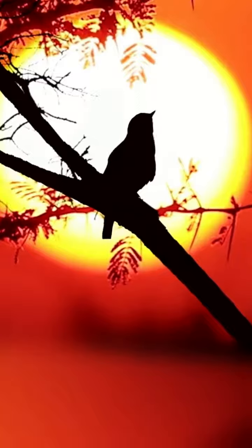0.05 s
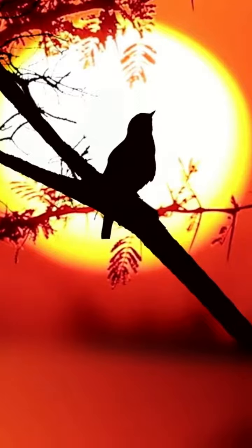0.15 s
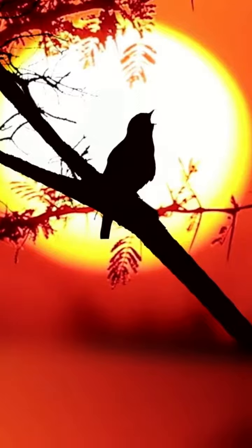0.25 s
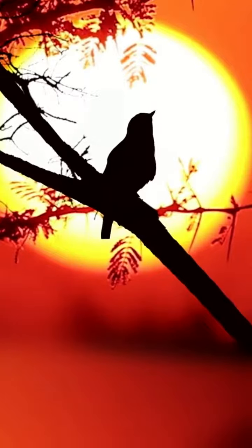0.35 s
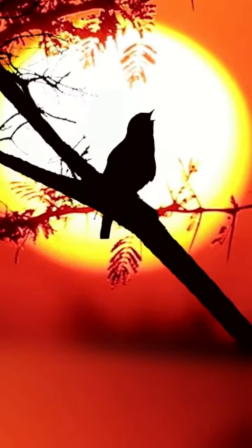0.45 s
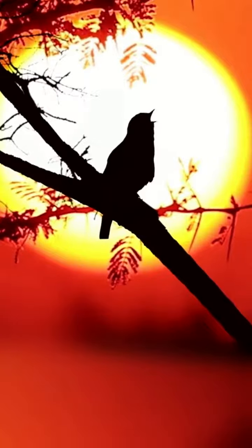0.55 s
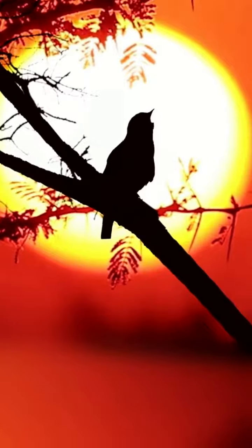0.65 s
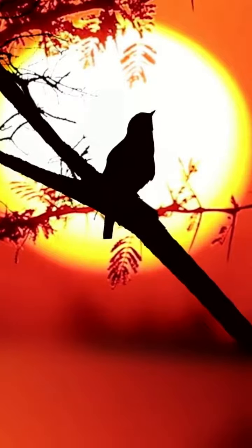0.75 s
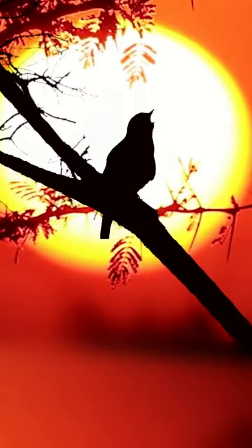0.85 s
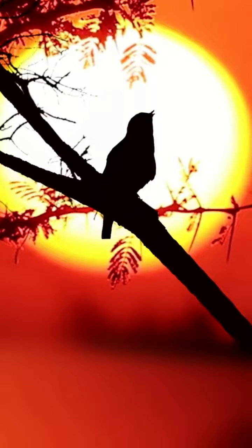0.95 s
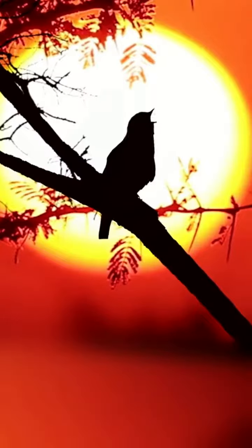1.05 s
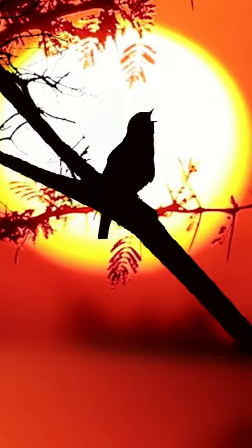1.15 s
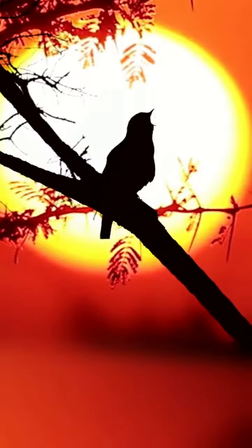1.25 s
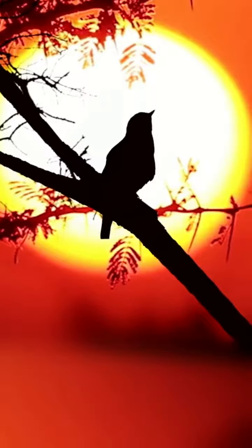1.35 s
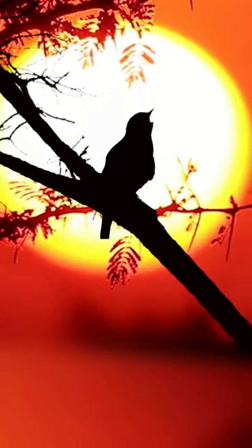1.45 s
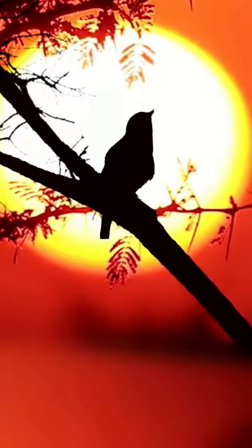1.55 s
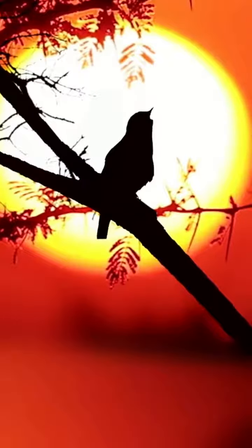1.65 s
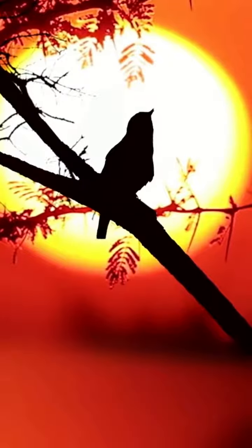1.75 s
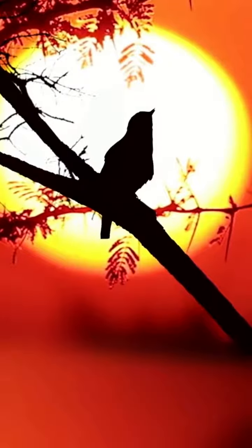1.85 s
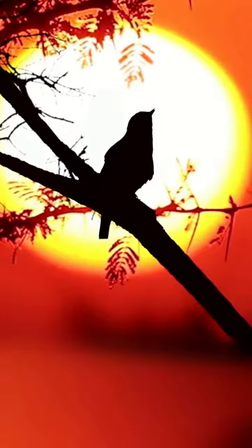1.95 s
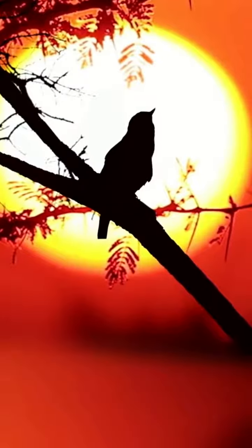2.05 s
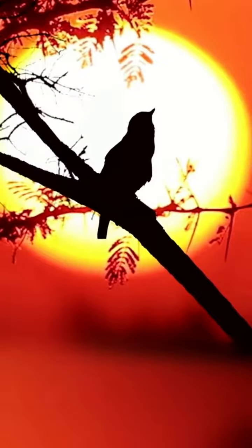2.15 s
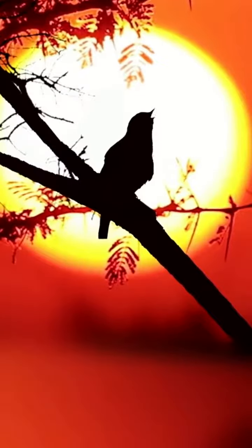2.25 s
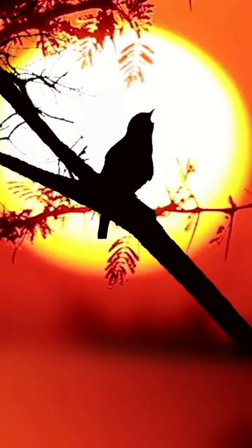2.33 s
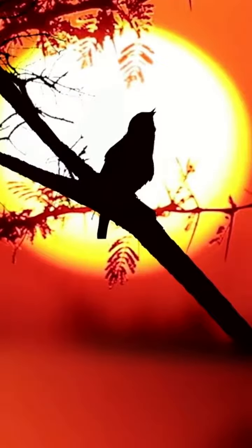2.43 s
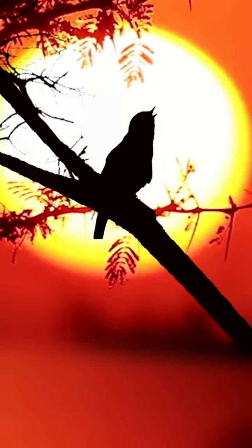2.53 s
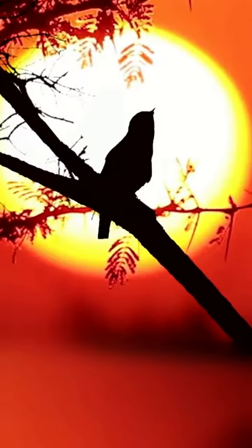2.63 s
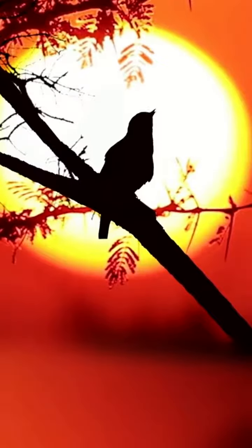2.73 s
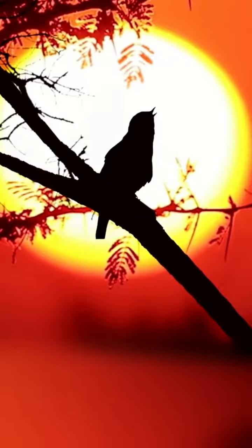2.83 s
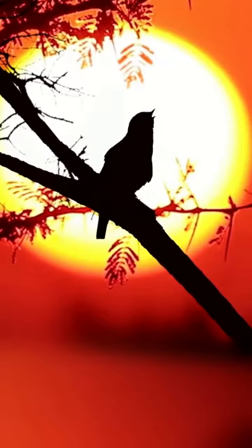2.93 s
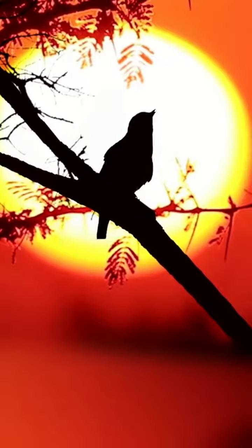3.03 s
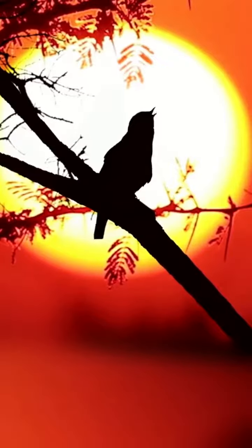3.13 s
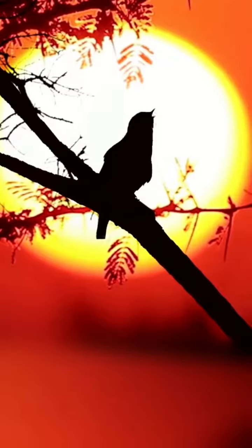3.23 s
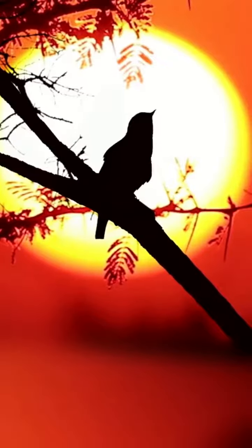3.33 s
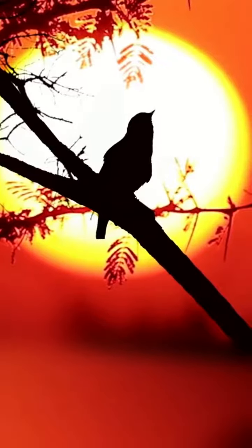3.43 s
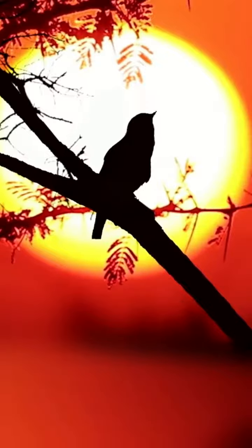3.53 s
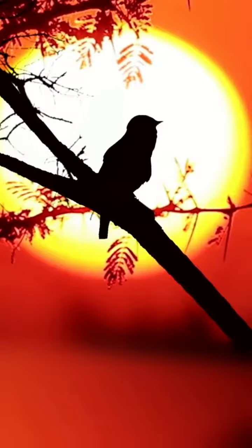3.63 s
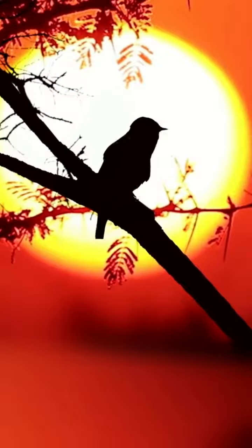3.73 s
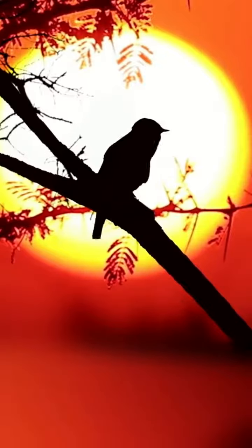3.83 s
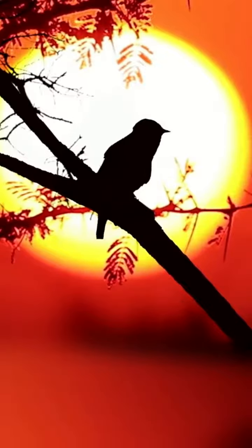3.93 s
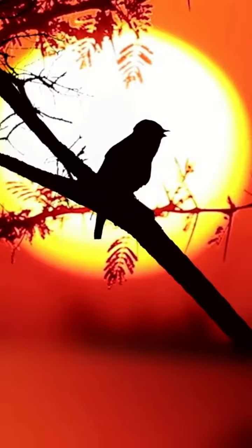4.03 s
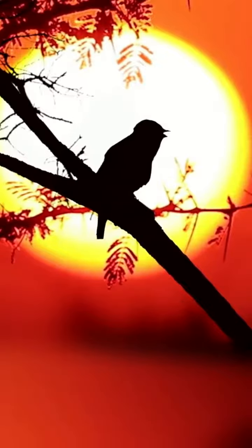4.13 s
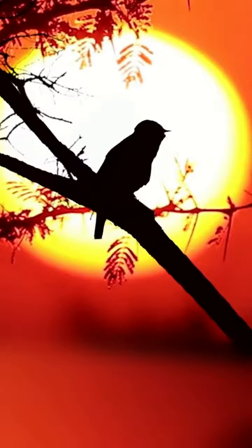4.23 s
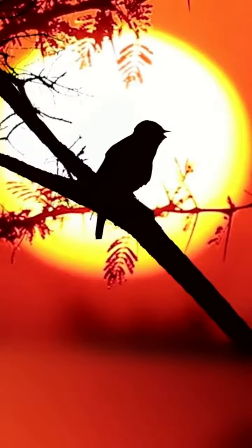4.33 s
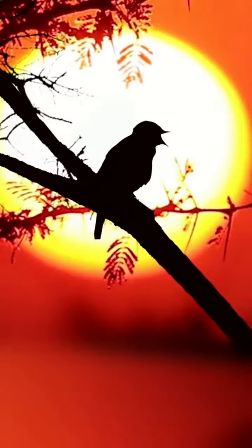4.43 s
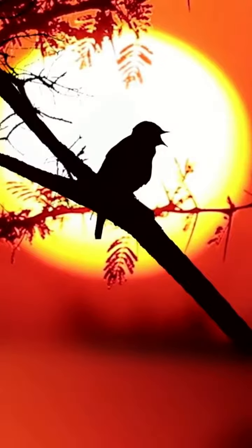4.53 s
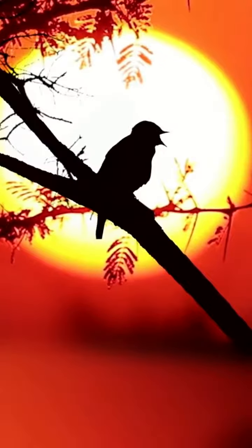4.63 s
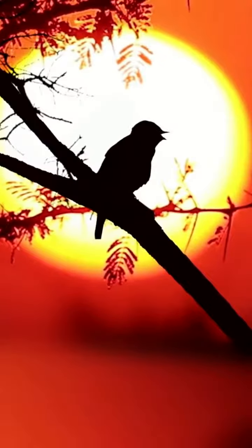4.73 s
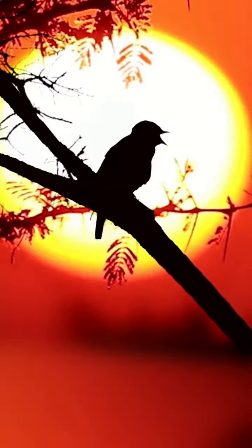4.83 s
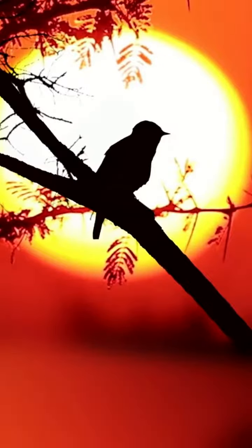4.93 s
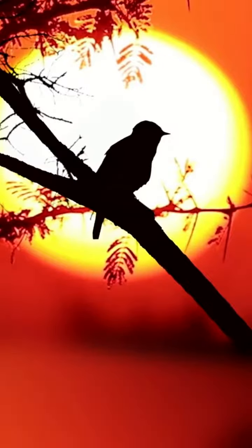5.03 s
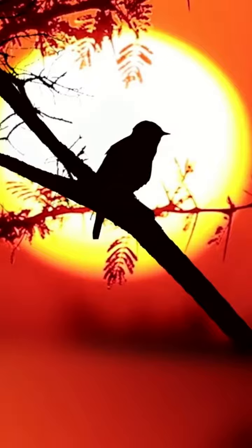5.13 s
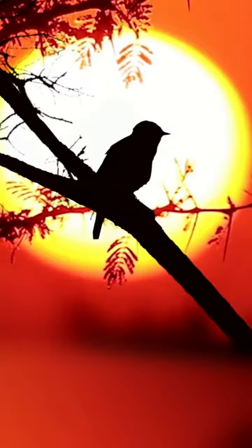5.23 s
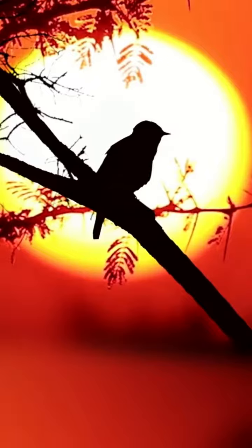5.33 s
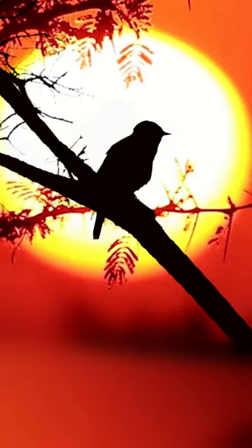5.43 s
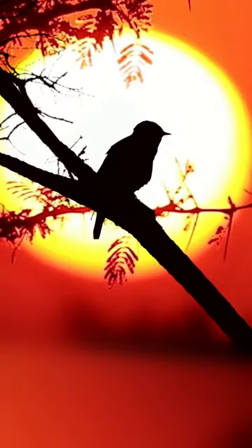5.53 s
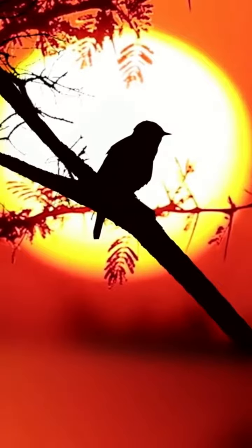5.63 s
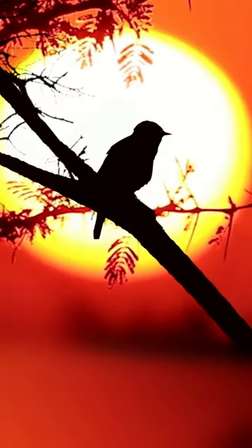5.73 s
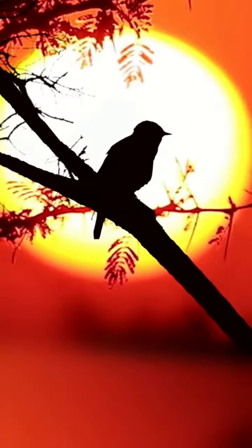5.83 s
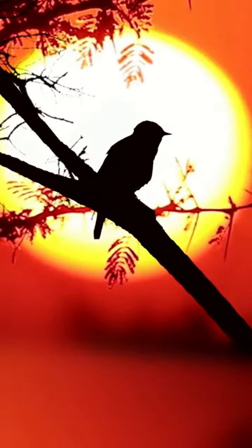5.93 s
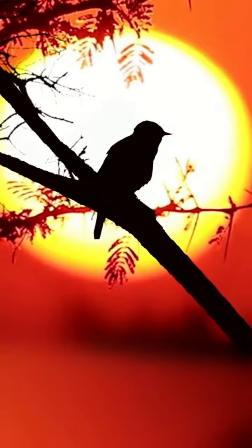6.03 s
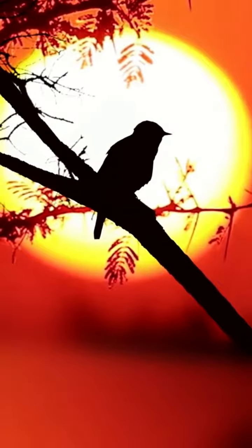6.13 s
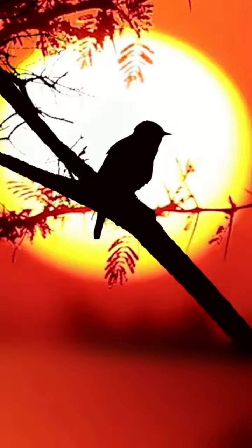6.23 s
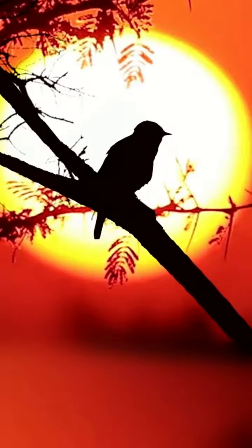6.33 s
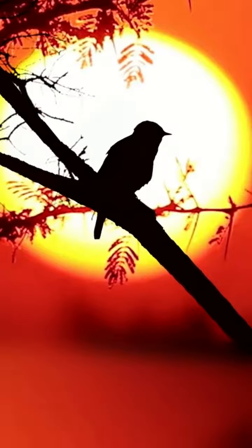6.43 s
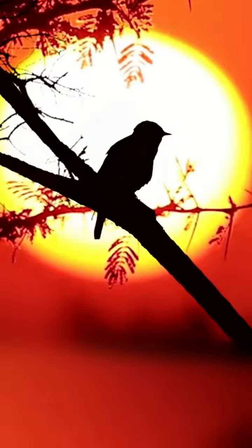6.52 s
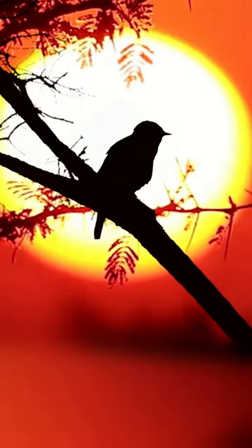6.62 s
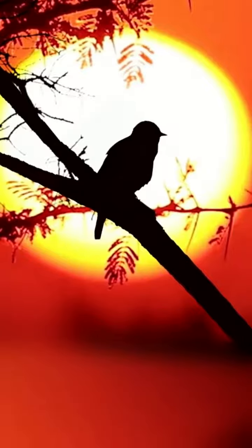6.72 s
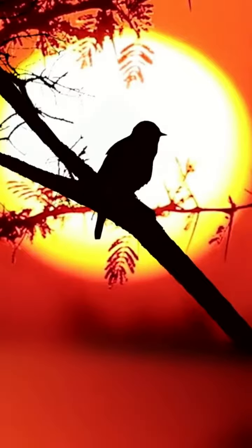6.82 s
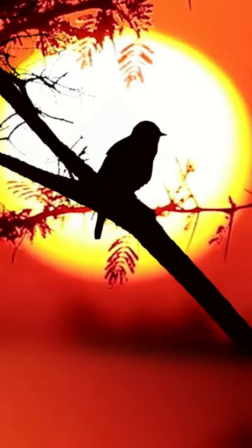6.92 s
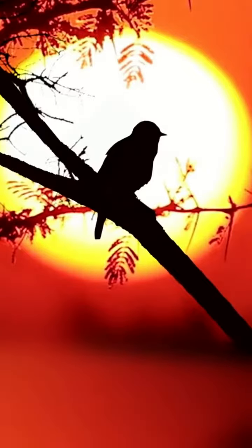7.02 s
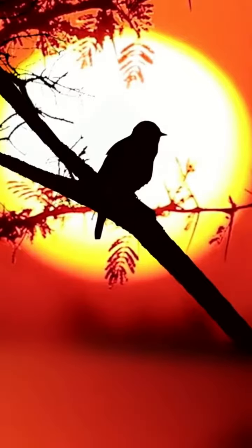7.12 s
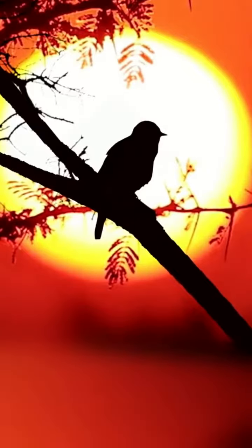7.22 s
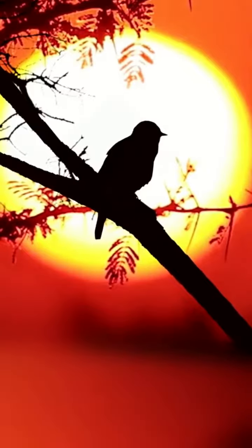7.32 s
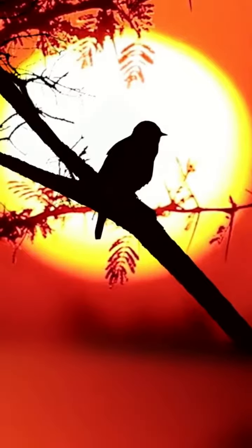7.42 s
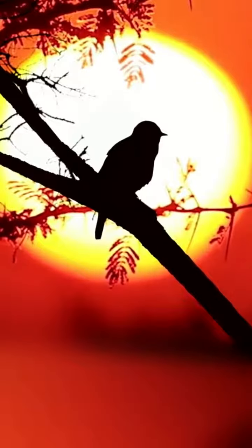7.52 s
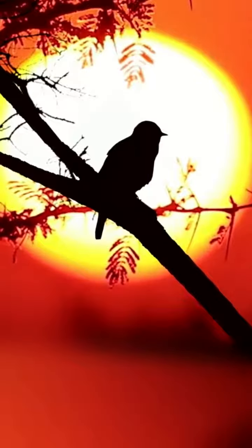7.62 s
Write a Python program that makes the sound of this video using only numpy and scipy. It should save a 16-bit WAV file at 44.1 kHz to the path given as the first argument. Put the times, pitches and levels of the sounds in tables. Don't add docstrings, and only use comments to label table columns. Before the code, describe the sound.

A single nightingale sings close in open woodland. Three high falling whistles each end in a snapped chirp and dry click, then come lower level whistles paired with sharp drops, a rapid ten-note trill, a rough buzz and a thin high closing note. Trees give a long ringing tail. After about five seconds the singer stops, leaving steady airy hiss, faint far chips, soft whistles and a very quiet dove.

```python
import sys
import numpy as np
from scipy import signal
from scipy.io import wavfile
from scipy.ndimage import uniform_filter1d

SR = 44100
rng = np.random.default_rng(int(sys.argv[2]) if len(sys.argv) > 2 else 0)


def store_pcm(level_fs):
    pcm = np.round(np.clip(level_fs, -1, 1) * 32767).astype(np.int16)
    wavfile.write(sys.argv[1], SR, np.atleast_2d(pcm).T)


def makeup_ratio(level_db):
    decades = np.asarray(level_db, float) / 20
    return 10 ** decades


N = 338247
LEAD_IN_S = 1.2

# (frequency [Hz], level per Hz [dB])
WASH_SPECTRUM = [(15, -34), (25, -9), (71, -6), (424, -10), (508, -2), (594, -6), (833, -2), (1360, -4.5),
                 (1860, -2.5), (2230, -2.5), (3130, -4.5), (9320, -17.5), (10300, -15), (11500, -53),
                 (12400, -41), (16100, -82), (22000, -120)]
# (start [s], end [s], level [dB])
DRONE_SWELLS = [
    (1.3, 1.9, -54),
    (4.3, 4.95, -51),
    (6.12, 6.3, -53),
    (7.6, 7.9, -57),
]
# (time [s], level [dB])
CHORUS_LEVEL = [(0, -44), (2.5, -49.5), (5.2, -42), (6.0, -47.5), (6.6, -48), (7.67, -48.5)]
# (frequency [Hz], correlation [-1..1])
PORT_LIKENESS = [(30, 0.85), (100, 1), (300, 0.23), (700, 0.39), (1500, 0.88), (4000, 0.85), (12000, 0.58)]
# (frequency [Hz], lead [rad])
PORT_LEAD = [(30, 0.3), (70, -0.9), (150, 2), (300, 1.5), (700, 2.5), (1500, 1.54), (4000, 0)]
# (frequency [Hz], gain [dB])
SIDE_GAIN = [(1000, 2), (2500, 5), (4000, -8.5), (7000, -7), (12000, -2.5)]

# (multiple [ratio], level [dB])
HIGH_TONE = [(1, 1.5), (2, -36), (3, -31.5), (4, -52)]
LOW_TONE = [(1, 1), (2, -39), (3, -49), (5, -38.5), (6, -34.5)]
CHIRP_TONE = [(1, 0), (2, -24.5), (3, -23.5)]
DROP_TONE = [(1, 0), (2, -38), (3, -44)]
TRILL_TONE = [(1, 0), (2, -42)]
BUZZ_TONE = [(3, 0), (3.8, -27), (4.25, -38)]

# (time from syllable start [s], pitch [Hz], level [dB])
HIGH_WHISTLE_SHAPE = [(0, 3070, -15), (.013, 3070, 1), (0.029, 2906, -3.5), (.05, 2712, -4),
                      (.1, 2590, -8.5), (.108, 2540, -19)]
SWOOP_SHAPE = [(-.004, 7800, -16.5), (0, 5760, -17), (.003, 4260, -2), (.007, 3280, -1.5),
               (.015, 2750, -6.5), (.024, 2350, -8), (.034, 2000, -15.5)]
HOOK_SHAPE = [(-.002, 4025, -10), (.001, 3800, -4.5), (.0035, 3497, -5.5), (.005, 2435, -2.5),
              (.008, 2572, 2.5), (.012, 2078, -5.5), (.019, 1500, -8.5), (.035, 1160, -22.5),
              (.065, 1149, -21.5)]
DROP_SHAPE = [(-.002, 3040, -37), (.001, 2603, 1), (.004, 2374, -4.5), (.01, 1746, -9.5),
              (.018, 1280, -19.5), (0.027, 913, -38)]
GRACE_SHAPE = [(-.018, 788, -16), (-.006, 913, -14), (.004, 1000, -8), (.014, 1047, -16)]
TRILL_SHAPE = [(-.001, 2790, -9), (.0015, 2476, -2.5), (.004, 1955, -0.5), (.007, 1563, -10.5),
               (.013, 1180, -18.5), (.021, 909, -34.5)]
BUZZ_SHAPE = [(-.003, 2800, -23), (.001, 2754, -2), (.004, 2725, -2), (.007, 2640, -8), (0.013, 2487, -13)]
FLOURISH_SHAPE = [(-.008, 2546, -19), (-.002, 4200, -16), (.004, 6990, 0), (.008, 7900, -1),
                  (.02, 7420, -2.5), (0.039, 6750, -4.5), (.066, 6110, -8.5), (0.079, 5850, -13.5)]

# (time [s], level [dB])
EARLIER_WHISTLES = [
    (-0.39, -1),
    (-1.1, -15),
]
# (time [s], level [dB], pitch factor [ratio], time stretch [ratio])
HIGH_WHISTLES = [
    (.131, -10.5, 1.0, 1.0),
    (.751, -9, 1, 1.02),
    (1.365, -8, 1.01, 1.05),
]
# (start [s], length [s], held pitch [Hz], level [dB])
LEVEL_WHISTLES = [
    (2.082, .055, 1764, -13),
    (2.765, 0.11, 1876, -10),
    (3.085, 0.13, 1824, -11),
    (3.405, 0.14, 1823, -11),
]
# (time [s], pitch [Hz], level [dB])
RISING_WHISTLE = [(2.31, 780, -44), (2.324, 845, -42.5), (2.336, 959, -37), (2.358, 1001, -29),
                  (2.452, 1150, -32.5), (2.48, 1156, -38)]
# (time [s], level [dB], pitch factor [ratio])
SWOOPS = [
    (.315, -8, 1.036),
    (.945, -8, 1.005),
    (1.553, -6.5, 1.036),
]
HOOKS = [
    (1.945, -9, 1.0),
]
DROPS = [(2.939, -6, 1.0), (3.254, -5.5, 0.99), (3.578, -5.5, 1)]
GRACES = [(3.772, -30, 1.0), (3.957, -29, 0.96), (4.15, -27.5, 1.0), (4.335, -27.5, 0.97), (4.52, -28, 1.0)]
TRILL_DROPS = [(3.704, -7.5, 0.86), (3.8045, -2, 0.9), (3.8899, -1, 0.94), (3.991, -2, 0.9),
               (4.0784, -0.5, 0.95), (4.179, -1.5, 0.94), (4.2693, -2.5, 0.9), (4.369, -2, 0.94),
               (4.4512, -2, 0.93), (4.55, -2.5, 0.99)]
FLOURISHES = [
    (5.091, -11, 0.99),
]
# (time [s], level [dB])
BUZZ_PULSES = [(4.6546, -9), (4.6682, -2), (4.683, -4.5), (4.697, -11), (4.7107, -7), (4.7248, -13),
               (4.741, -10), (4.755, -11), (4.769, -8.5), (4.7844, -10.5), (4.8117, -8), (4.8299, -7),
               (4.8506, -9), (4.8743, -11.5), (4.8958, -11), (4.9176, -7.5), (4.9402, -10.5), (4.9615, -11),
               (4.9831, -16)]
# (time [s], level [dB], length [s], beak resonance factor [ratio])
RASPS = [(0.54, -22, 0.0075, 0.907), (.553, -19, 0.0047, 0.794), (1.17, -28.5, 0.0062, 0.92),
         (1.177, -19, 0.0063, 0.808), (1.766, -19, 0.0076, 0.87), (1.777, -20, 0.0086, 0.813),
         (2.582, -13, 0.011, 0.937), (2.604, -14.5, 0.014, 1.06), (2.624, -28, .03, 0.97),
         (5.084, -20.5, 0.011, 0.874), (5.088, -23.5, 0.019, 1.036), (1.949, -46, 0.0042, 1.07)]
# (frequency [Hz], width [Hz], level [dB])
BEAK = [(1660, 590, -10), (4200, 1040, -2.5), (5740, 2680, 3.5), (8550, 950, -4), (11340, 1600, -4.5)]

# (delay [s], level [dB])
TRUNK_ECHOES = [(.006, -11.5), (0.015, -16), (0.022, -36)]
# (frequency [Hz], level [dB])
LEAF_SCATTER = [(1000, 2.5), (2000, -1.5), (3000, 3.5), (6000, 14.5), (12000, 9.5)]
# (frequency [Hz], t60 [s])
WOOD_T60 = [(800, 1.9), (1800, 3.78), (2800, 2.62), (5000, 0.74), (8000, 0.82), (12000, 0.34)]
# (delay [s], spread [s], level [dB])
TREE_LINES = [(.11, 0.011, 3.5), (.26, 0.011, 3.5), (.33, 0.019, 2.5), (.47, 0.0071, 5)]
# (frequency [Hz], width [Hz], level [dB])
HOLLOWS = [(2685.5, 44, 12), (1830, 53, -1.5), (3000, 380, -5.5)]

# (start [s], length [s], first pitch [Hz], last pitch [Hz], level [dB])
FAR_CHIPS = [(5.475, 0.034, 4800, 5330, -34), (5.81, 0.037, 5300, 5150, -32),
             (6.17, 0.027, 5250, 5250, -34.5), (6.825, .06, 6100, 4700, -33.5),
             (6.54, 0.124, 3300, 3200, -39.5), (3.997, .03, 6050, 4700, -35),
             (4.332, 0.019, 6000, 4500, -32), (4.9, 0.16, 640, 640, -48.5), (6.13, 0.15, 645, 640, -47.5)]
DOVE = [(5.22, .22, 502, 500, -55), (5.58, .24, 508, 506, -58), (6.05, .15, 505, 500, -61),
        (6.45, .3, 510, 500, -58), (7.0, .18, 500, 500, -60), (7.2, .28, 500, 505, -58)]
FAR_WHISTLES = [(6.34, 0.12, 1657, 1583, -42.5), (6.5, 0.13, 1637, 1570, -40.5),
                (6.665, 0.1, 1601, 1577, -40), (6.84, 0.12, 1612, 1574, -37.5),
                (6.02, 0.116, 1900, 1903, -42), (6.73, 0.117, 1910, 1821, -36),
                (7.04, 0.123, 1876, 1812, -40), (7.37, 0.12, 1908, 1830, -39.5)]


def evened(x):
    return x / np.sqrt(np.mean(x ** 2) + 1e-20)


def smooth_noise(count, size):
    return evened(uniform_filter1d(rng.standard_normal(count), size=size))


def blurred(x, size_0, size_1):
    return uniform_filter1d(uniform_filter1d(x, size=size_0, axis=0), size=size_1, axis=1)


def read(points, hz):
    f, value = np.transpose(points)
    return np.interp(np.log(hz + 1), np.log(f + 1), value)


def song_track():
    return np.zeros(N + round(LEAD_IN_S * SR))


def add(track, start_s, sound):
    part = track[round((start_s + LEAD_IN_S) * SR):][:len(sound)]
    part += sound[:len(part)]


def air(colour, patchy_db):
    frames, hz = N // 256 + 5, np.fft.rfftfreq(1024, 1 / SR)
    a, b, c, d, patches = rng.standard_normal((frames, 513, 5)).T
    patches = evened(blurred(patches, 10, 14))
    same = np.clip(read(PORT_LIKENESS, hz), -1, 1)[:, None]
    left = a + 1j * b
    right = same * left + np.sqrt(1 - same ** 2) * (c + 1j * d)
    right = right * np.exp(-1j * read(PORT_LEAD, hz))[:, None]
    colour_db = read(colour, hz) - 40 * (hz > 11700)
    z = np.array([left, right]) * makeup_ratio(colour_db[:, None] + patchy_db * patches)
    return evened(signal.istft(z, nperseg=1024, noverlap=768)[1][:, :N])


def wash():
    return makeup_ratio(-45) * air(WASH_SPECTRUM, 2.2)


def rumble():
    return makeup_ratio(-74.0) * air([(40, -35), (60, 2), (75, -5.5), (100, -45.0)], 2.1)


def drone():
    t, rest_db, edge_s = np.arange(N) / SR, -62, 0.23
    level_db = rest_db
    for start, end, db in DRONE_SWELLS:
        inside = np.minimum(t - start, end - t)
        level_db = level_db + (db - rest_db) * np.clip(inside / edge_s + 1, 0, 1)
    return makeup_ratio(level_db) * air([(150, -34), (230, -2), (300, 0.5), (420, -0.5), (600, -52)], 2.3)


def chorus():
    s, db = np.transpose(CHORUS_LEVEL)
    gain = makeup_ratio(np.interp(np.arange(N) / SR, s, db))
    return gain * air([(1200, -68), (1800, -5.5), (3000, 11), (5200, 4), (7500, -7.5)], 3.6)


def syrinx(rows, tone, flutter_db=0.5, waver=0.003, breathy=0.35, soft=0.075):
    s, hz, db = np.transpose(rows)
    t = np.arange(s[0], s[-1], 1 / SR)
    pitch_shake, level_shake, breath = [smooth_noise(len(t), size) for size in (120, 120, 50)]
    hz = np.exp(uniform_filter1d(np.interp(t, s, np.log(hz)), size=60)) * (1 + waver * pitch_shake)
    turns = np.cumsum(hz) / SR
    wave = 0
    for k, level in tone:
        blur = 1 + (k > 3) * breathy * k / 2 * breath
        wave = wave + makeup_ratio(level) * blur * np.sin(2 * np.pi * k * turns) * (k * hz < 14000)
    level_db = uniform_filter1d(np.interp(t, s, db), size=50) + flutter_db * level_shake
    return s[0], np.sqrt(2) * wave * makeup_ratio(level_db) * signal.windows.tukey(len(t), soft)


def sing(track, shape, start_s, db, factor, tone, stretch=1, **voice):
    rows = np.array(shape) * [stretch, factor, 1] + [start_s, 0, db]
    add(track, *syrinx(rows, tone, **voice))


def high_whistles(track):
    for s, db in EARLIER_WHISTLES:
        sing(track, HIGH_WHISTLE_SHAPE, s, db - 12.5, 1, HIGH_TONE, waver=.001)
    for s, db, factor, stretch in HIGH_WHISTLES:
        sing(track, HIGH_WHISTLE_SHAPE, s, db, factor, HIGH_TONE, stretch, flutter_db=-0.23, waver=0.00054)


def resonate(x, hz, width_hz):
    return signal.lfilter(*signal.iirpeak(min(hz, 20000), hz / width_hz, SR), x)


def rasp(start_s, db, length_s, beak):
    t = np.arange(1600) / SR
    puffs = .5 + np.cos(np.pi * 480 * t + 1.0 * smooth_noise(1600, 90)) ** 2
    gate = np.clip(np.minimum(t / 0.0012, (length_s - t) / 0.0017), 0, 1)
    drive = rng.standard_normal(1600) * puffs * gate
    rung = 0
    for hz, width_hz, level in BEAK:
        once = resonate(drive, hz * beak, width_hz)
        rung = rung + makeup_ratio(level) * resonate(once, hz * beak, width_hz)
    return start_s, makeup_ratio(db) * rung / np.sqrt(np.sum(rung ** 2) / (length_s * SR))


def chirps(track):
    for shape, times, tone in ((SWOOP_SHAPE, SWOOPS, CHIRP_TONE), (HOOK_SHAPE, HOOKS, CHIRP_TONE),
                               (DROP_SHAPE, DROPS, DROP_TONE), (GRACE_SHAPE, GRACES, CHIRP_TONE)):
        for s, db, factor in times:
            sing(track, shape, s, db, factor, tone)
    for s, db, factor in SWOOPS:
        add(track, *rasp(s - .002, db - 20.5, 0.0075, 1.27))


def rasps(track):
    for row in RASPS:
        add(track, *rasp(*row))


def level_whistle(start_s, length_s, hz, db):
    full_s, sharp_hz = start_s + 0.242 * length_s, hz * (1 + 0.02056)
    return [(start_s, sharp_hz, db - 14), (full_s, sharp_hz, db), (full_s + 0.012, hz, db),
            (start_s + 0.74 * length_s, hz, db - 2.5), (start_s + length_s, hz * .996, db - 11.5)]


def low_whistles(track):
    for rows in [level_whistle(*row) for row in LEVEL_WHISTLES] + [RISING_WHISTLE]:
        add(track, *syrinx(rows, LOW_TONE, flutter_db=0.19, waver=0.00074))


def trill(track):
    for s, db, factor in TRILL_DROPS:
        sing(track, TRILL_SHAPE, s, db - 6.5, factor, TRILL_TONE)


def buzz(track):
    for s, db in BUZZ_PULSES:
        since_s = s - BUZZ_PULSES[0][0]
        lower_db = -19.5 + 19.5 * np.exp(-since_s / 0.011) + 21 * since_s
        tone = BUZZ_TONE + [(2.0 - 0.16 * since_s, lower_db)]
        sing(track, BUZZ_SHAPE, s, db - 5.5, 1 - .04 * since_s, tone, flutter_db=2.0, waver=0.017, soft=0.39)


def flourish(track):
    for s, db, factor in FLOURISHES:
        sing(track, FLOURISH_SHAPE, s, db, factor, [(1, 0)], flutter_db=-0.5, waver=0.0095)


def nightingale():
    track = song_track()
    for part in (high_whistles, chirps, rasps, low_whistles, trill, buzz, flourish):
        part(track)
    return track


def trunks(x):
    path = np.zeros((2, 2000))
    for delay_s, db in TRUNK_ECHOES:
        smear = rng.standard_normal((2, 120)) * 0.13 * np.hanning(120)
        smear[:, 0] = 6
        path[:, round(delay_s * SR):][:, :120] += makeup_ratio(db) * smear / np.linalg.norm(smear[0])
    return signal.oaconvolve(x[None], path, axes=1)[:, :len(x)]


def wood(x):
    taps = np.zeros((3, 2 * SR))
    at = np.arange(200, 2 * SR - 20, 20) + rng.integers(0, 20, (3, (2 * SR - 201) // 20))
    np.put_along_axis(taps, at, rng.choice([-1., 1.], at.shape), 1)
    hz, t, z = signal.stft(taps, SR, nperseg=512)
    column_hz = hz[:, None]
    bush = makeup_ratio(-60 * t / 0.3 + read(LEAF_SCATTER, hz)[:, None])
    lines_db = sum(db * np.exp(-.5 * ((t - delay) / spread) ** 2) for delay, spread, db in TREE_LINES)
    late = makeup_ratio(-60 * t / read(WOOD_T60, hz)[:, None] + lines_db / (1 + (column_hz / 3500) ** 4))
    late *= makeup_ratio(sum(db / (1 + ((column_hz - f) / width) ** 2) for f, width, db in HOLLOWS))
    tail = signal.istft(z * (late + bush), SR, nperseg=512)[1]
    shared = 0.58
    tail = shared * tail[2] + (1 - shared) * tail[:2]
    return signal.fftconvolve(x[None], tail / np.linalg.norm(tail[0]), axes=1)[:, :len(x)]


def arch(start_s, length_s, first_hz, last_hz, db):
    share = np.array([0, 0.18, 0.69, 1])
    level_db = db - 7.5 * np.array([1, 0, 0, 1])
    return np.transpose([start_s + share * length_s, first_hz + share * (last_hz - first_hz), level_db])


def far_birds():
    track = song_track()
    for row in FAR_CHIPS:
        add(track, *syrinx(arch(*row), [(0.98, -6.5)], flutter_db=6.5, waver=0.0087))
    for row in DOVE + FAR_WHISTLES:
        add(track, *syrinx(arch(*row), [(1, 0)], flutter_db=3.0, waver=0.0081))
    return track


def scene():
    bird, far = nightingale(), far_birds()
    near = makeup_ratio(-1.0) * bird * makeup_ratio([[-.2], [.2]]) + trunks(bird)
    birds = near + makeup_ratio(-3.5) * far + makeup_ratio(-5.5) * wood(bird + makeup_ratio(-2) * far)
    return birds[:, -N:] + drone() + rumble() + chorus() + wash()


def masked(x):
    hz, t, z = signal.stft(x, SR, nperseg=1024, noverlap=768)
    column_hz, frame = hz[:, None], np.arange(len(t))
    band_db = 10 * np.log10(blurred(abs(z[0]) ** 2, 7, 3) + 1e-14)
    octaves = abs(np.log2((column_hz + 1) / (hz[band_db.argmax(0)] + 3)))
    after_db = uniform_filter1d((band_db - 4 * (column_hz > 2300)).max(0), size=20)
    after_db = np.interp(frame - 12, frame, after_db)
    top_db = np.interp(frame - 2, frame, uniform_filter1d(band_db.max(0), size=12))
    limit_db = np.where(column_hz < 1200, after_db - 39, top_db - 31 - 11 * octaves)
    luck = evened(blurred(rng.standard_normal((len(t), len(hz))), 30, 6)).T
    starved = (luck > 1.45) & (column_hz > 2900)
    plain_db = uniform_filter1d(band_db, size=40, axis=0) + 8
    limit_db = np.where(starved, np.maximum(limit_db, plain_db), limit_db)
    z = z * makeup_ratio(-25 * np.clip((limit_db - band_db) / 4, 0, 1))
    z[1] *= makeup_ratio(read(SIDE_GAIN, hz))[:, None]
    return signal.istft(z, SR, nperseg=1024, noverlap=768)[1][:, :N]


def top_cut(x):
    return signal.sosfilt(signal.butter(12, 12610, fs=SR, output="sos"), x)


def record(dry):
    mid, side = masked(np.array([dry[0] + dry[1], dry[0] - dry[1]]) / 2)
    limited = np.tanh(np.array([mid + side, mid - side]) * 0.65) / 0.58
    low_pass = signal.firwin(511, 12350, window=("kaiser", 7), fs=SR)
    mix = signal.oaconvolve(limited, low_pass[None], "same")
    return top_cut(mix)


dry = scene()
out = record(dry)
store_pcm(out)
```